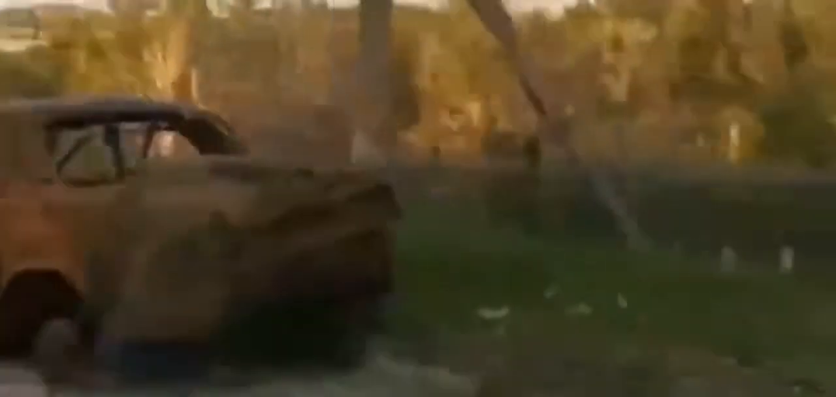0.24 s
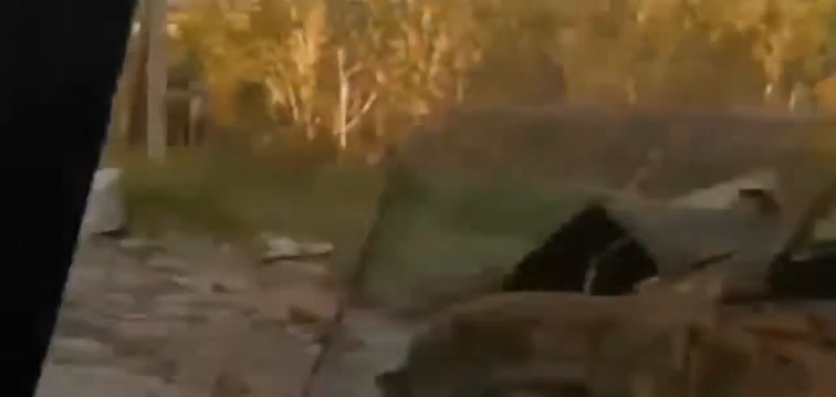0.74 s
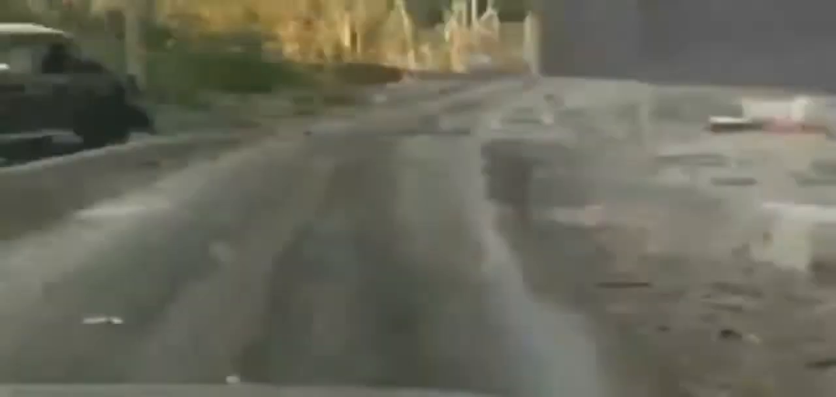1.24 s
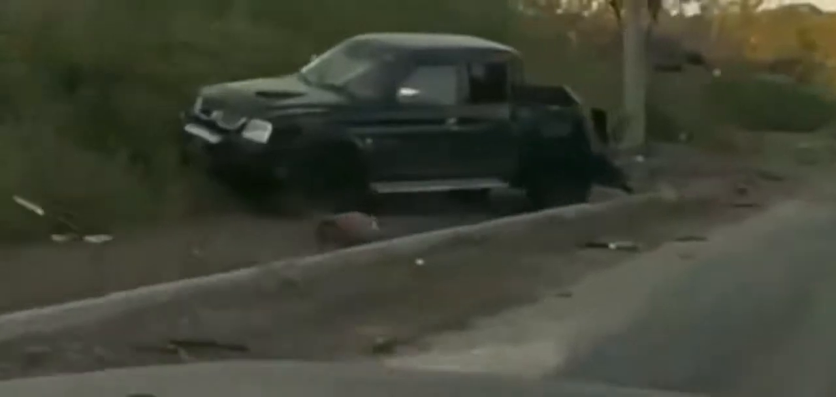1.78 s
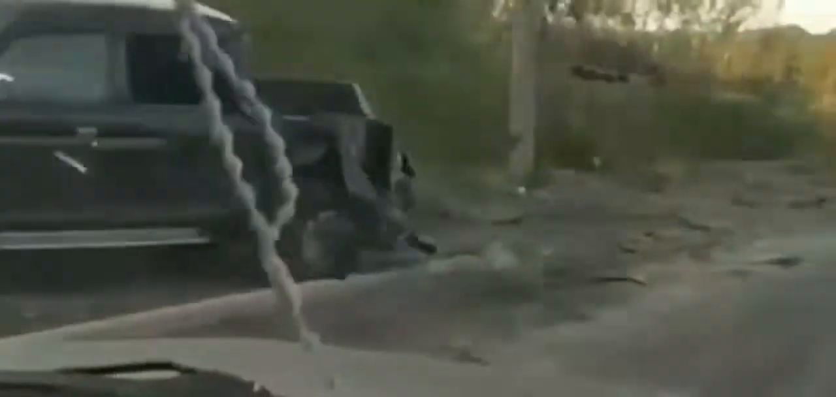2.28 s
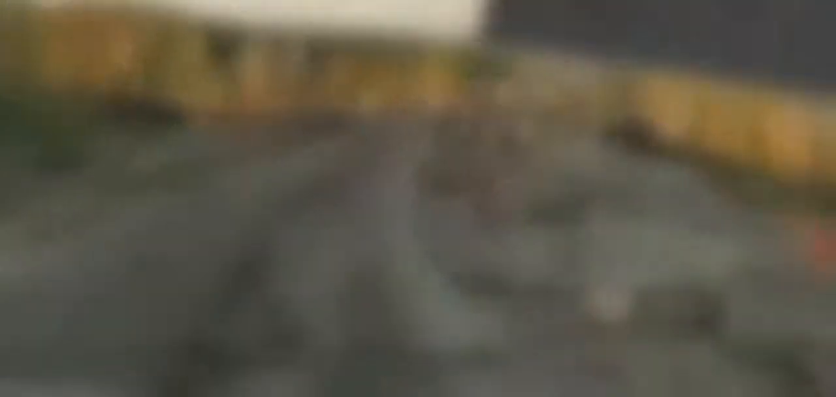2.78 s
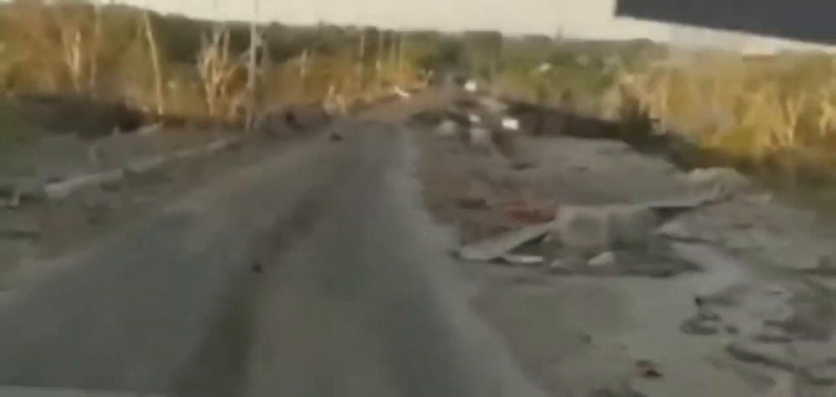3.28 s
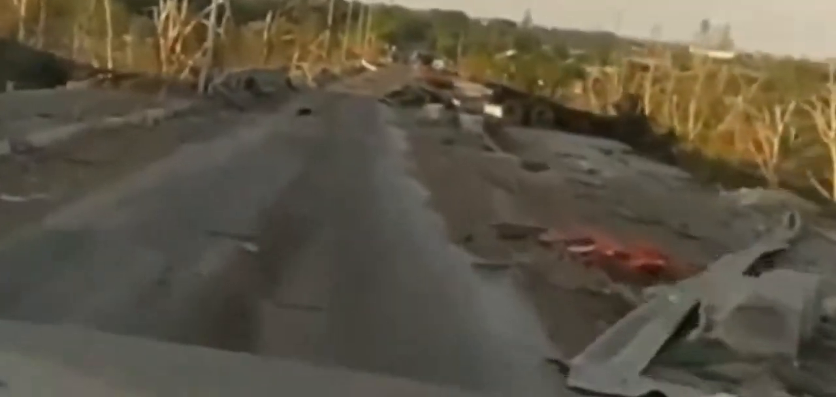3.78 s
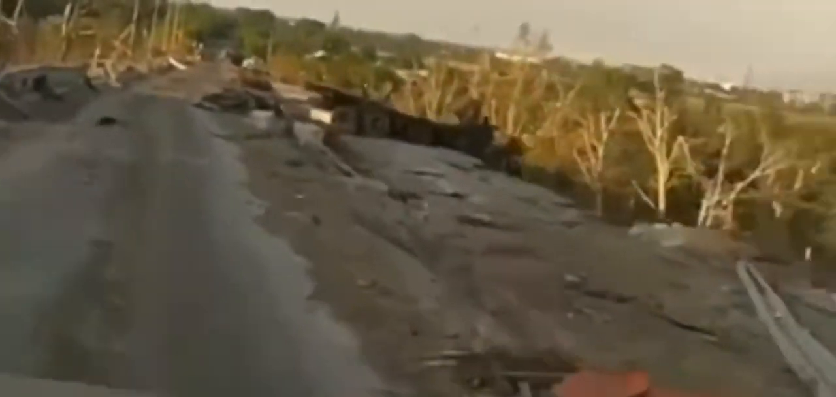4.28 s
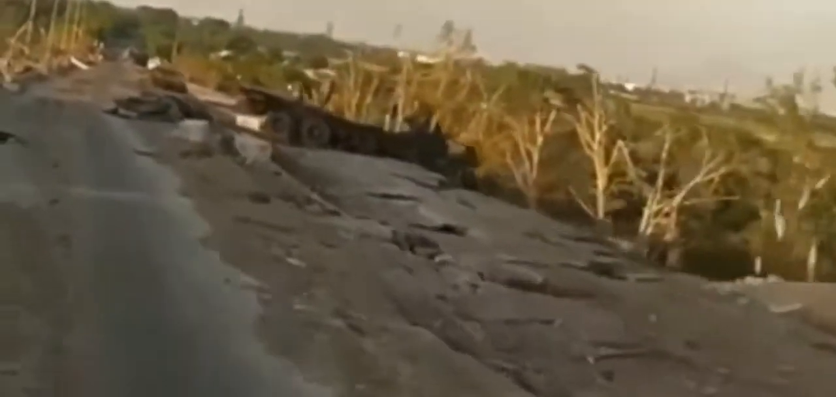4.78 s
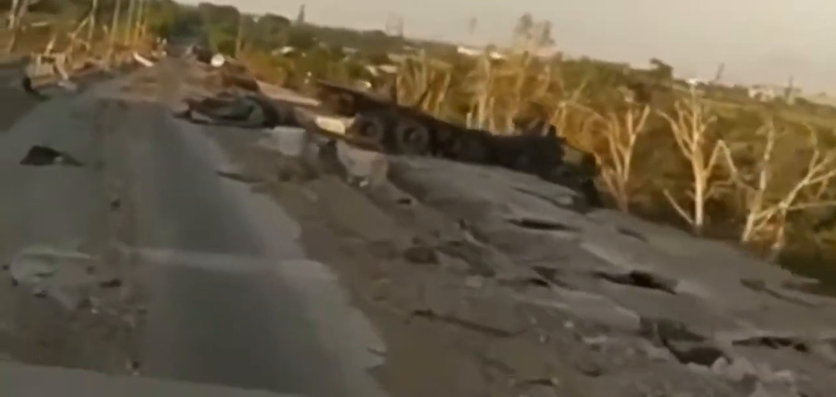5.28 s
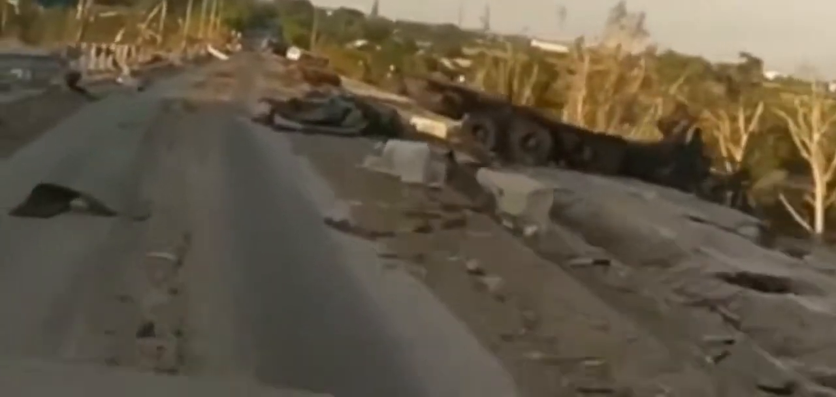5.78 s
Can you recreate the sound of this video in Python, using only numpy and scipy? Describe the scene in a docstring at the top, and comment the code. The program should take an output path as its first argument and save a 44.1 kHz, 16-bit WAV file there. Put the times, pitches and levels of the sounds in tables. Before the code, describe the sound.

Close, rough handheld sound inside a moving vehicle: constant low rumble, humming tyre and engine noise, faint low gusts. Rough patches bring soft suspension thuds, grainy trim chatter, flung stones pinging, hard knocks on panels and tiny squeaks. Low microphone bumps appear near the first second, almost only at right. The ride eases, roughens again midway, eases once more, and ends in short knocks and rattles.

```python
"""The body of a vehicle shudders and booms on a broken road: shaped noise and resonators that follow the road.
Tyres and engine roar as steady noise with a humming band; loose trim chatters and rattles as grainy noise.
Thuds, panel knocks and flung stones ring damped modes; a joint squeaks and metal parts chirp as short tones.
Hard grains tick as noise bursts, a low draught gusts, and dull knocks on the right microphone ring as
short low pulses, faint on the left."""
import sys
import numpy as np
from scipy import signal
from scipy.io import wavfile

SR = 44100
rng = np.random.default_rng(int(sys.argv[2]) if len(sys.argv) > 2 else 0)


def ratio(d):
    """dB to gain"""
    e = np.asarray(d, float) / 20
    return 10 ** e


def to_wav(sig):
    """Store sig (one row per channel, or 1-D mono) as 16-bit WAV at the path in sys.argv[1].

    Samples outside -1..1 are clipped; the rate is SR.
    """
    pcm = np.clip(np.atleast_2d(sig), -1, 1) * 32767
    pcm = np.round(pcm).astype(np.int16)
    wavfile.write(sys.argv[1], SR, pcm.T)  # frames by channels


N = 266364

# Spectrum of the loose trim, which flung stones share. Each row: frequency in Hz, relative density in dB per Hz.
CHATTER_SPECTRUM = [(880, -60), (1500, 10), (2110, 10), (3250, 5.5), (3700, 3.5), (3990, 6.5), (4810, 4.5),
                    (5900, 2.5), (8090, 7.5), (8880, 8.5), (11000, 4), (11500, -38), (14900, -68),
                    (22000, -120)]


def rms_one(x):
    """Normalises a signal to unit root-mean-square value."""
    return x / np.sqrt(np.mean(x ** 2) + 1e-20)


def in_time(rows):
    """Interpolates each column linearly over time, which stands in the first column."""
    s, *columns = np.transpose(rows)
    return [np.interp(np.arange(N) / SR, s, c) for c in columns]


def at_hz(points, hz):
    """Interpolates a spectrum in dB along logarithmic frequency."""
    points = np.array(points)
    return np.interp(np.log(hz), np.log(np.maximum(points[:, 0], 1)), points[:, 1])


def drift(corner_hz):
    """Slow random fluctuation of unit spread: white noise through two equal low-pass poles."""
    step = 40   # computed at every 40th sample
    settle = 2000
    r = np.exp(-2 * np.pi * step * corner_hz / SR)
    white = rng.standard_normal(N // step + settle + 2)
    slow = signal.lfilter([1], [1, -2 * r, r * r], white)[settle:]
    return np.interp(np.arange(N) / step, np.arange(len(slow)), rms_one(slow))


def band(x, low_hz, high_hz):
    """Band-pass filter with maximally flat response."""
    edges = [low_hz, min(high_hz, .45 * SR)]
    return signal.sosfilt(signal.butter(2, edges, "band", fs=SR, output="sos"), x)


def ring(x, hz, t60):
    """Damped resonator: a unit click rings as a sine of initial height 1, falling 60 dB in t60 seconds."""
    r, w = ratio(-60 / (t60 * SR)), 2 * np.pi * hz / SR
    return signal.lfilter([0, np.sin(w)], [1, -2 * r * np.cos(w), r * r], x + 1e-18)


def noise():
    """Two independent pairs of white noise, with half a second of lead-in for filters to settle."""
    return rng.standard_normal((2, 2, N + SR // 2))


def grit(per_s, spread_db):
    """Noise modulated by shot noise: dense uneven contacts ride on a smooth floor."""
    sizes = ratio(spread_db * np.minimum(rng.exponential(1, N), 4))
    hits = (rng.random(N) < per_s / SR) * sizes
    touch = signal.lfilter([1], [1, -.985], hits)
    return rng.standard_normal((2, 2, N)) * (4.5 + rms_one(touch))


def coloured(spectrum, flicker_db, white, per_octave=3):
    """Band synthesis of stereo noise: bands flicker partly together and partly alone; mid rms 1."""
    # Each row: frequency in Hz, side level against mid in dB.
    side_levels = [(30, -42), (110, -20), (190, -10.5), (340, -6.5), (610, -7), (1090, 0), (1940, 1.5),
                   (3460, 0), (6170, 0.5), (11000, 0.5)]
    low, high = spectrum[0][0], spectrum[-1][0]
    edges = np.geomspace(low, high, int(per_octave * np.log2(high / low)) + 2)
    mid, side = 0, 0
    together = drift(17.0)
    for k, (a, b) in enumerate(zip(edges, edges[1:])):
        hz = np.sqrt(a * b)
        level_db = at_hz(spectrum, hz) + flicker_db * (together + drift(17.0))
        m, s = band(white[k % 2], a, b)[:, -N:] * ratio(level_db)
        mid = mid + m
        side = side + s * ratio(at_hz(side_levels, hz))
    return np.array([mid + side, mid - side]) / np.sqrt(np.mean(mid ** 2))


def body_shudder(shudder_db):
    """Forced vibration: the uneven road drives the body as low-frequency noise."""
    # Each row: frequency in Hz, relative density in dB per Hz.
    spectrum = [(8.8, 20), (15, -1), (24, 10.5), (36, 4), (60, 0), (110, -9.5), (140, -99), (240, -120)]
    return ratio(shudder_db) * coloured(spectrum, 0.44, noise())


def cabin_boom(rise_db, shudder_db):
    """Resonance under broadband excitation: air and panels of the cabin sound within the road noise."""
    # Each row: frequency in Hz, relative density in dB per Hz.
    spectrum = [(47, -3), (80, -17), (113, -7.5), (178, 0), (297, -9.5), (376, -2), (500, -23.5),
                (650, -19), (1100, -120)]
    # Each row: mode frequency in Hz, bandwidth in Hz, level in dB before any swell.
    cabin_modes = [(143, 56, -4), (183.6, 19, -1), (232.2, 13.7, -5.5)]
    # Swell of the two narrow modes. Each row: time in seconds, lower note in dB, upper note in dB.
    note_swells = [(0, 4.5, -0.5), (0.7, 4, -1), (1.2, -3, -3), (2.1, -4, -2.5), (2.7, 1.5, -4),
                   (3.9, -1.5, -1), (4.4, 0, 1.5), (5.2, -3, 5), (6.04, 1.5, 1.5)]
    side_db = -19   # side against mid in the modes
    calm_db, calm_shudder_db = -29, -23
    out = coloured(spectrum, 0.57, noise())
    for (hz, width_hz, level_db), swell_db in zip(cabin_modes, [0, *in_time(note_swells)]):
        t60 = np.log(1000) / np.pi / width_hz
        mid, side = rms_one(ring(rng.standard_normal((2, N)), hz, t60))
        resonance = mid + ratio(side_db) * side * [[1], [-1]]
        out = out + ratio(level_db + swell_db) * resonance
    # the boom follows a share of the chatter's rise and of the shudder's
    boom_db = calm_db + 0.27 * rise_db + 0.18 * (shudder_db - calm_shudder_db)
    return ratio(boom_db) * rms_one(out)


def roar(rise_db):
    """Broadband radiation: tyres and engine sound as steady noise, lifted a little by rough patches."""
    # Each row: frequency in Hz, relative density in dB per Hz.
    spectrum = [(240, -72), (400, -26), (490, 22), (544, -7.5), (648, 1), (865, -2), (2450, -18),
                (2970, -24), (4000, -58), (5200, -65), (8800, -120)]
    # Each row: time in seconds, level in dB before the rise with the bumps.
    steady_level = [(0, -37.5), (1, -36.5), (2, -38), (2.5, -37.5), (3.2, -37.5), (4, -37), (4.6, -36),
                    (5.3, -36.5), (6.04, -38)]
    roar_db = in_time(steady_level)[0] + 0.26 * rise_db
    return ratio(roar_db) * coloured(spectrum, 1.0, noise())


def drone():
    """Narrow-band resonance: noise through a resonator hums in the tyre roar, coming and going."""
    # Each row: time in seconds, level in dB.
    drone_level = [(0, -49), (1, -47), (1.9, -43.5), (2.2, -39), (2.9, -47), (3.3, -58), (4.5, -57),
                   (6.04, -46)]
    centre_hz, width_hz = 667, 39
    hum = ring(rng.standard_normal((2, N)), centre_hz, np.log(1000) / np.pi / width_hz)
    return ratio(in_time(drone_level)[0]) * rms_one(hum + 0.6 * hum[::-1])


def draught():
    """Turbulence: faint low-frequency noise in slow gusts, independent in each channel's fine structure."""
    gusts = ratio(-38 + 4.4 * drift(3))
    return gusts * rms_one(band(rng.standard_normal((2, N)), 16, 150))


def trim_chatter(chatter_db):
    """Repeated contact: loose trim touches its mounts unevenly, giving grainy bright noise."""
    return ratio(chatter_db) * coloured(CHATTER_SPECTRUM, 1.8, grit(300, 2.5), per_octave=5)


def gravel(chatter_db):
    """Random impact excitation: each small stone flung at the underside rings one of 24 damped pitches."""
    per_s, ring_cycles = 400, 35   # cycles for a 60 dB decay
    level_db, spread_db = -10, 4   # against the chatter, before the spectrum
    sizes = ratio(chatter_db + level_db + spread_db * np.minimum(rng.exponential(1, N), 4))
    sizes = sizes * rng.choice([-1, 1], N)
    born = rng.random(N) < per_s / SR
    dealt = rng.integers(0, 24, N)
    out = np.zeros((2, N))
    for k, hz in enumerate(np.geomspace(1100, 9400, 24)):
        pings = ring(sizes * born * (dealt == k), hz, ring_cycles / hz)
        out[k % 2] += ratio(at_hz(CHATTER_SPECTRUM, hz)) * pings   # pitches alternate between sides
    return out + 0.31 * out[::-1]


def rattles(chatter_db):
    """Contact bursts: tiny impacts swell and die away; heavier parts add a lower clack."""
    # Each row: time in seconds, treble level in dB, low part against treble in dB, 60 dB decay in seconds.
    bursts = [(0.0262, -38, 14.5, 0.051), (0.2385, -32, 4, 0.12), (0.3092, -44.5, 18, 0.047),
              (0.405, -26.5, -9, 0.041), (0.588, -42, 13.5, 0.11), (0.877, -40.5, -13, 0.045),
              (1.0715, -39.5, -25, 0.15), (1.1817, -25, -11, 0.033), (1.275, -23.5, -12, 0.16),
              (1.403, -30, 3, 0.054), (1.488, -29.5, 4, 0.11), (1.5213, -25, -0.5, 0.059),
              (1.584, -24, -16, 0.034), (1.636, -29.5, -3, 0.11), (1.724, -29, -2.5, 0.17),
              (1.784, -29.5, -1, 0.14), (1.8602, -30, -22, 0.022), (1.937, -42, 9, 0.054),
              (1.9645, -36.5, -6, 0.15), (2.0212, -44.5, 15, 0.1), (2.508, -40, 7.5, 0.092),
              (2.6155, -34.5, -4, 0.03), (2.7816, -35.5, -3, 0.039), (3.116, -31, -15, 0.026),
              (3.372, -30.5, 2.5, 0.079), (3.3977, -23.5, -11, 0.034), (3.431, -23.5, -8, 0.025),
              (3.33, -51.5, 16, 0.17), (3.695, -55.5, 25, 0.051), (3.478, -40, 5, 0.36),
              (3.572, -30, 2, 0.1), (3.6037, -32, -2, 0.35), (3.6745, -27.5, -2.5, 0.05),
              (4.2802, -48, 3, 0.22), (4.314, -37.5, -4, 0.048), (4.46, -35.5, -10, 0.019),
              (4.731, -53.5, 9, 0.14), (4.785, -38.5, -6, 0.07), (5.212, -37.5, -13, 0.062),
              (5.4535, -40.5, -3, 0.073), (5.733, -37, -1, 0.16), (5.763, -31, 2.5, 0.044),
              (5.841, -35, -1, 0.029), (5.944, -32.5, -16, 0.072)]
    contacts_per_s, smooth_floor = 1300, 1.8
    rise_s, ring_db = 0.0012, -7
    stray_count, stray_db, stray_spread_db = 40, -4, 2.5   # strays at random, against the chatter
    stray_low_db, stray_t60 = -12.5, 0.076

    white = rng.standard_normal((2, 2, N))
    contacts = (rng.random(N) < contacts_per_s / SR) * rng.exponential(1, N)
    white = white * (smooth_floor + rms_one(signal.lfilter([1], [1, -.9], contacts)))
    bright = rms_one(band(white[0], 6500, 11000))
    dull = rms_one(band(white[1], 580, 4600))
    # successive rattles take turns at five narrow ringing bands
    rings = [ratio(ring_db) * rms_one(band(white[0], hz - 130, hz + 130)) for hz in np.linspace(8480, 9120, 5)]

    when = rng.random(stray_count) * N / SR
    luck = rng.standard_normal((stray_count, 2))
    strays = [(s, chatter_db[int(s * SR)] + stray_db + stray_spread_db * a, stray_low_db + 6 * b, stray_t60)
              for s, (a, b) in zip(when, luck)]
    out = np.zeros((2, N))
    for k, (s, level_db, low_db, t60) in enumerate(bursts + strays):
        i = max(int((s - .002) * SR), 0)   # the swell begins 2 ms ahead
        t = np.arange(min(SR // 5, N - i)) / SR
        here = slice(i, i + len(t))
        shape = (1 - np.exp(-t / rise_s)) * ratio(-60 * (t / max(t60, .01)) ** 1.496)
        pan_db = -0.5 - 0.03 * low_db   # left minus right: heavier parts sit further right
        sides = ratio(level_db + np.array([[pan_db], [-pan_db]]) / 2)
        parts = bright[:, here] + rings[2 * k % 5][:, here] + ratio(low_db) * dull[:, here]
        out[:, here] += sides * shape * parts
    return out


def thuds(shudder_db):
    """Modal excitation: soft blows through the springs strike the body modes with chance strengths."""
    # Suspension blows. Each row: time in seconds, strike level in dB, tilt in dB per octave about 140 Hz,
    # lean in dB from the third mode to the fourth.
    blows = [(0.099, -11.5, -0.5, 20), (0.185, -13.5, 1, 13), (0.347, -12, 8.5, 5), (0.36, -3, -1.5, -2),
             (1.405, -5, 4, 1), (1.56, -11, 5, -8), (1.636, -11, 5.5, 0.5), (2.003, -17, 1, 5),
             (3.058, -18.5, -10, -5), (3.24, -16, -1, 3), (3.337, -29, 10, 0), (3.36, -10, -3, -3.5),
             (3.525, -9.5, 3, 10), (3.56, -14, 6, -2), (3.59, -11, 3, 15), (3.668, -18, 10.5, 5),
             (4.271, -21.5, 2, 11), (4.988, -15, 3, -2), (5.678, -18, -4, 10), (5.752, -14.5, -2, 15),
             (5.934, -19, -10, 0)]
    # Each row: mode frequency in Hz, relative level in dB, 60 dB decay in seconds.
    body_modes = [(57.3, -3, 0.1), (87, -7, 0.061), (139.3, -4.5, 0.15), (183.5, -8, 0.085),
                  (242, -7.5, 0.042), (300, -7, 0.021), (423, -10, 0.015), (633, -28, 0.072),
                  (806, -28, 0.025)]
    small_count, small_tilt_db = 30, 4   # small jolts at random
    contact_s, right_lag_s = 0.01175, 0.00051

    when = rng.random(small_count) * N / SR
    small_db = shudder_db[(when * SR).astype(int)] - 2 + 5 * rng.standard_normal(small_count)
    small = np.transpose([when, small_db, np.full(small_count, small_tilt_db), np.zeros(small_count)])
    rows = np.vstack([blows, small])
    start_s, strike_db, tilt_db, lean_db = rows.T
    luck_db = rng.normal(0, 2.5, (len(rows), len(body_modes)))
    # a blow spreads through the body: each mode is reached at its own moment
    reached_s = start_s[:, None] + contact_s * rng.random(luck_db.shape)
    reached = np.minimum(reached_s * SR, N - 1).astype(int)
    out = np.zeros(N)
    for k, (hz, mode_db, t60) in enumerate(body_modes):
        lean = {2: -0.5, 3: 0.5}.get(k, 0)
        click_db = strike_db + mode_db + tilt_db * np.log2(hz / 140) + lean * lean_db + luck_db[:, k]
        clicks = np.zeros(N)
        clicks[reached[:, k]] = ratio(click_db)
        out += ring(clicks, hz, t60)
    return np.array([out, np.roll(out, int(right_lag_s * SR))])


def squeaks():
    """Stick-slip vibration: a rubbing joint gives unsteady two-partial tones; small metal parts chirp."""
    # Each row: time in seconds, level in dB, frequency in Hz, length in seconds, second partial in dB.
    rubs = [(0.138, -42, 3570, 0.029, -12), (0.455, -31, 1760, 0.014, -5), (0.517, -29.5, 3600, 0.026, -10),
            (1.432, -23, 3720, 0.029, -9), (1.652, -29, 3640, 0.016, -10), (1.94, -37.5, 3340, 0.027, -3),
            (3.374, -32.5, 3700, 0.032, -8), (3.573, -25.5, 3700, 0.023, 0), (3.634, -35, 3700, 0.031, 2)]
    # Bright chirps of small metal parts. Each row: time in seconds, level in dB, frequency in Hz.
    chirps = [(0.353, -27, 8860), (1.524, -22.5, 9100), (1.5863, -26, 8640), (1.724, -23, 8660),
              (2.022, -35, 7240)]
    chirp_s, flutter_db = 0.013, 3.5
    out = np.zeros((2, N))
    waver, flutter = drift(33), drift(150)
    tones = rubs + [(*row, chirp_s, -60) for row in chirps]
    for s, level_db, hz, length, second_db in tones:
        i, size = int((s - .004) * SR), int(length * SR)   # each tone begins 4 ms ahead
        here = slice(i, i + size)
        phase = 2 * np.pi * np.cumsum(hz * (1 + 0.0037 * waver[here])) / SR
        apart = np.array([[0], [1.5]])   # phase between the channels in radians
        tone = np.sin(phase + apart) + ratio(second_db) * np.sin(2 * phase + apart)
        swell = np.sin(np.pi * np.linspace(0, 1, size) ** 0.62) * ratio(flutter_db * flutter[here])
        out[:, here] += ratio(level_db) * swell * tone
    return out


def knocks():
    """Impact on a plate: stones and hard parts strike panel modes with chance strength in each channel."""
    # Each row: time in seconds, strike level in dB, tilt in dB per octave about 1800 Hz.
    strikes = [(0.352, -26, -7), (1.49, -24, -5), (1.529, -26, -1), (1.549, -26, -5), (1.574, -22, 0),
               (1.638, -30, -7), (1.766, -23, -2), (3.16, -35, -8), (3.372, -23, -6), (3.431, -30, -1),
               (3.485, -22, -2.5), (3.532, -36, -6), (3.571, -21, -5), (3.633, -31, -2),
               (3.676, -20.5, -1.5), (5.764, -20, 1), (5.773, -20, -2.5), (5.939, -27, -8),
               (5.978, -28, -5)]
    # Each row: mode frequency in Hz, relative level in dB.
    panel_modes = [(620, 1), (850, 2.5), (1150, -1), (1450, -4), (1800, -5), (2250, -5), (2600, -5.5),
                   (3100, -18.5), (3800, -2.5), (4400, -3.5), (5300, -11)]
    contact_s, t60 = 0.003, 0.021
    start_s, strike_db, tilt_db = np.transpose(strikes)
    luck_db = rng.normal(0, 4, (len(strikes), len(panel_modes), 2))
    # modes are reached at scattered moments, mostly early in the contact
    reached_s = start_s[:, None, None] + contact_s * rng.random(luck_db.shape) ** 2
    reached = (reached_s * SR).astype(int)
    out = np.zeros((2, N))
    for k, (hz, mode_db) in enumerate(panel_modes):
        mode_strike_db = strike_db - 6 + mode_db + tilt_db * np.log2(hz / 1800)
        clicks = np.zeros((2, N))
        for side in range(2):
            clicks[side, reached[:, k, side]] = ratio(mode_strike_db + luck_db[:, k, side])
        out += ring(clicks, hz, t60)
    return out


def mic_knocks():
    """Damped impulse response: each dull knock on the right microphone is a short pulse with a low ring."""
    # Each row: time in seconds, level in dB, ringing frequency in Hz.
    pulses = [(0.722, -6, 90), (0.791, -11, 137), (0.811, -11.5, 300), (0.819, -10, 181), (0.857, -10, 126),
              (0.894, -4.5, 350), (0.906, -16.5, 163), (0.952, -8.5, 198), (1.035, -7, 377),
              (1.059, -11, 300), (1.068, -30, 166), (1.145, -14, 115), (1.181, -14, 245)]
    out = np.zeros(N)
    low_noise = rms_one(band(rng.standard_normal(N), 98, 332))
    t = np.arange(SR // 10) / SR
    onset = 1 - np.exp(-t / 0.00029)
    for s, level_db, hz in pulses:
        i = int(s * SR)
        here = slice(i, i + len(t))
        low_ring = np.sin(2 * np.pi * hz * t) * ratio(-60 * t * hz / 8.9)   # falls 60 dB in 8.9 cycles
        rumble = 0.43 * low_noise[here] * ratio(-60 * t / 0.19)
        out[here] += ratio(level_db) * onset * (low_ring + rumble)
    return out * np.array([[.15], [1]])   # faint on the left


def ticks():
    """Impulsive contact: a hard grain snaps against glass as a few milliseconds of bright noise."""
    # Each row: time in seconds, level in dB before the band-pass.
    snaps = [(1.1817, -16), (1.405, -16), (1.49, -23), (1.565, -4.5), (1.64, -15), (1.697, -15),
             (1.767, -15.5), (3.5715, -25), (4.464, -32), (5.4545, -36), (5.766, -36), (6.0294, -18)]
    t60 = 0.0032
    out, t = np.zeros((2, N)), np.arange(SR // 100) / SR
    for s, level_db in snaps:
        i = int(s * SR)
        out[:, i:i + len(t)] += ratio(level_db - 60 * t / t60) * rng.standard_normal((2, len(t)))
    return band(out, 3000, 16000)


def scene():
    """Superposition: the road sets the shudder and chatter, and all sources add linearly."""
    # The road under the wheels. Each row: time in seconds, body shudder in dB, loose trim chatter in dB.
    road = [(0.0, -13, -49), (0.18, -16, -38.5), (0.42, -14.5, -34.5), (0.6, -16, -42.5),
            (0.75, -17.5, -49.5), (1.02, -25.5, -54), (1.24, -13.5, -35), (1.33, -13, -39),
            (1.46, -13, -31), (1.68, -12.5, -33.5), (2.05, -21, -52), (2.2, -21.5, -52),
            (2.9, -21.5, -50.5), (3.05, -16, -51.5), (3.28, -18.5, -45.5), (3.38, -16, -38),
            (3.74, -12, -41.5), (3.85, -16.5, -48.5), (4.05, -22.5, -53.5), (4.5, -20, -51),
            (5.66, -23.5, -54), (5.78, -15.5, -42), (5.9, -18.5, -49), (6.04, -15.5, -36.5)]
    shudder_db, chatter_db = in_time(road)
    rise_db = chatter_db + 55   # above the chatter of a calm road, -55 dB
    out = body_shudder(shudder_db) + cabin_boom(rise_db, shudder_db)
    out = out + roar(rise_db) + drone() + draught()
    out = out + trim_chatter(chatter_db) + gravel(chatter_db) + rattles(chatter_db)
    return out + thuds(shudder_db) + squeaks() + knocks() + mic_knocks() + ticks()


def low_pass(x):
    """Removes everything above the highest recorded frequency."""
    return signal.sosfilt(signal.butter(12, 11610, fs=SR, output="sos"), x)


def record(dry):
    """Delay, saturation and low-pass: a faint late copy of the right joins the left; peaks are rounded."""
    late = np.roll(band(dry[1], 910, 6600), 13)   # delay in samples
    x = dry + 0.025 * late * np.array([[1], [0]])
    rounded = 1.6 * np.tanh(x / 2)
    mix = signal.sosfilt(signal.butter(12, 10000, fs=SR, output="sos"), rounded)
    return low_pass(mix)


dry = scene()
out = record(dry)
to_wav(out)
```